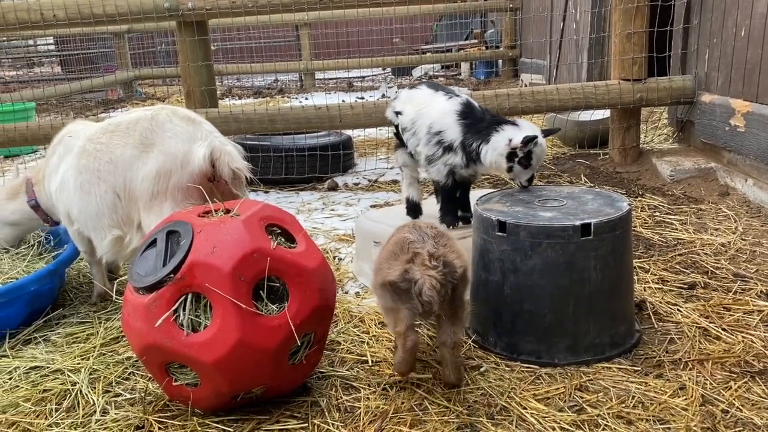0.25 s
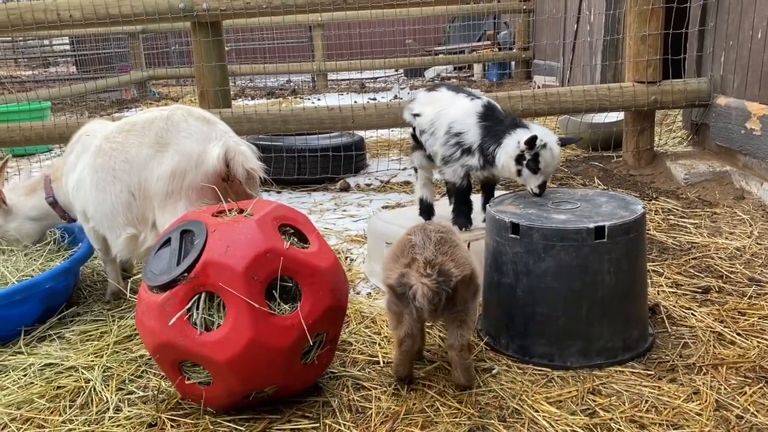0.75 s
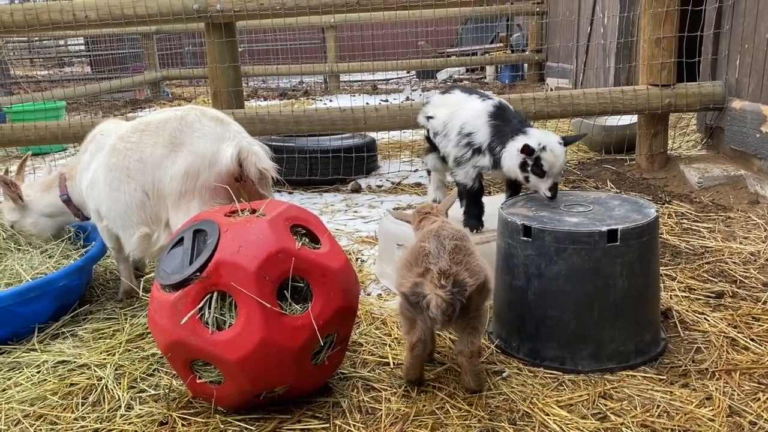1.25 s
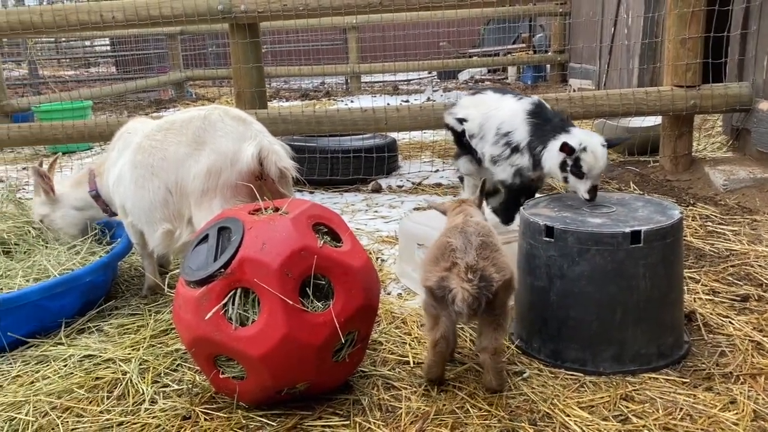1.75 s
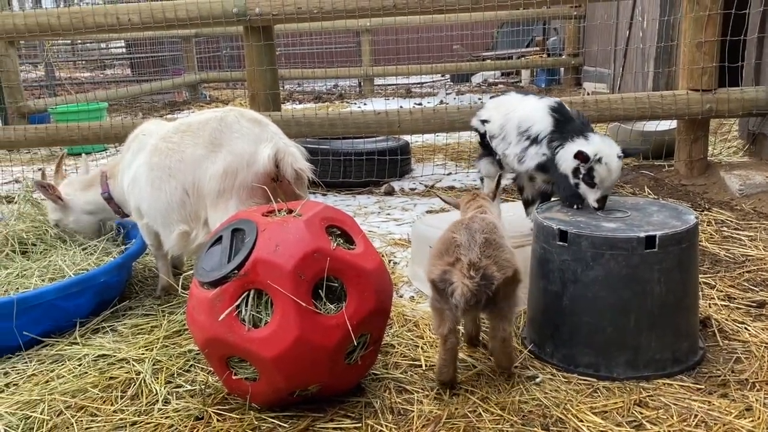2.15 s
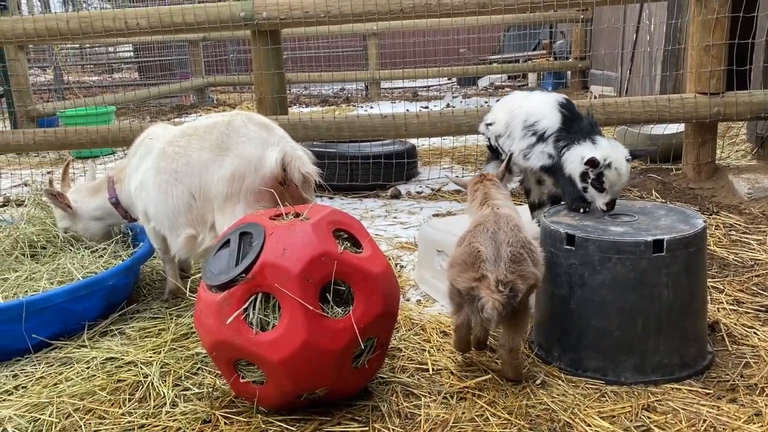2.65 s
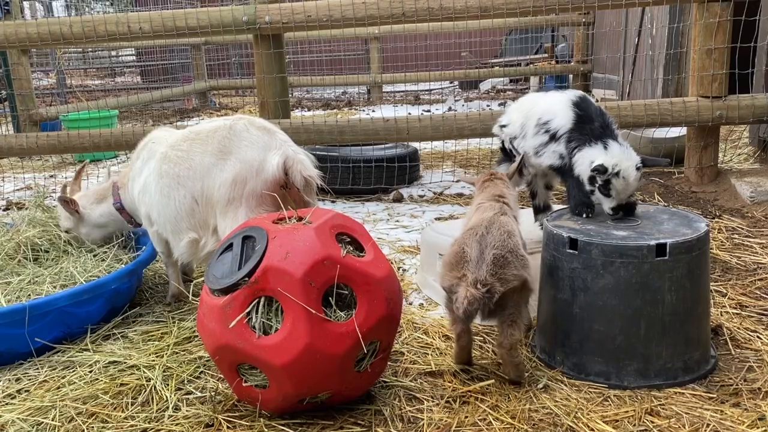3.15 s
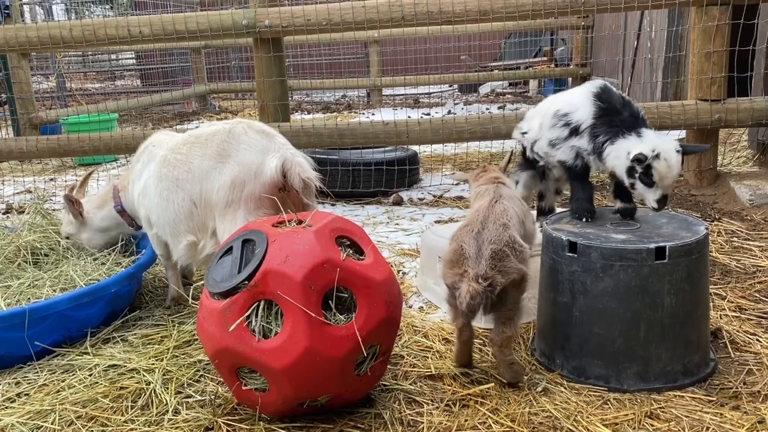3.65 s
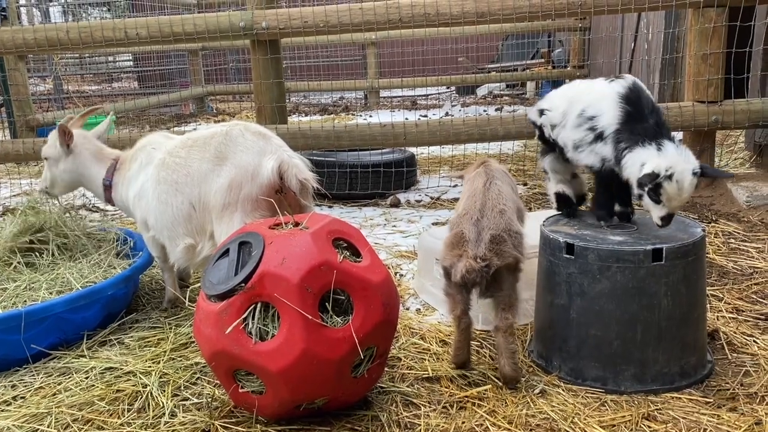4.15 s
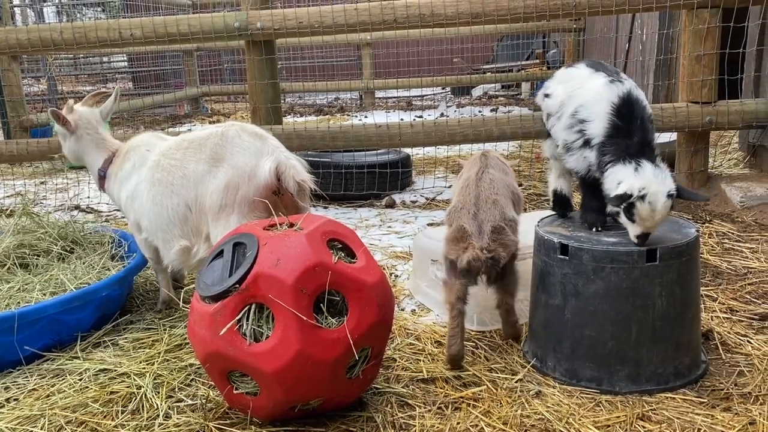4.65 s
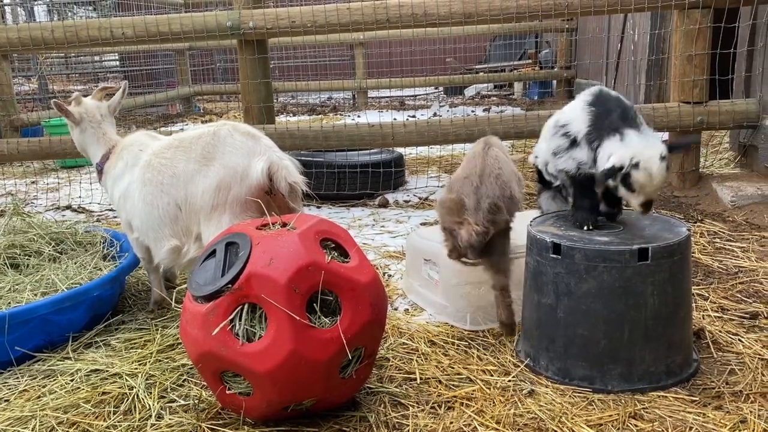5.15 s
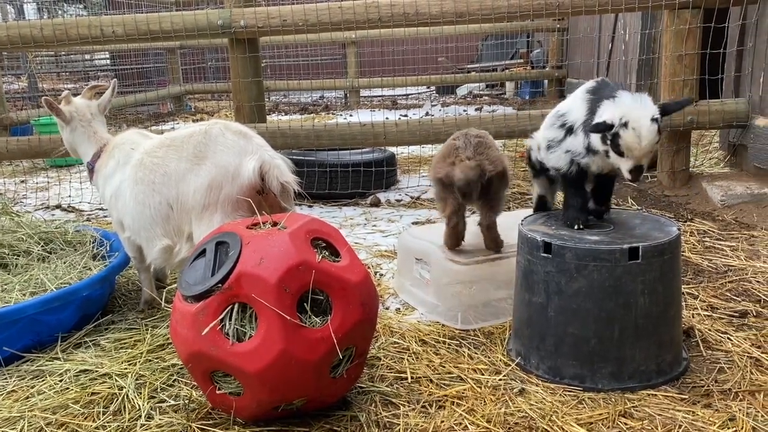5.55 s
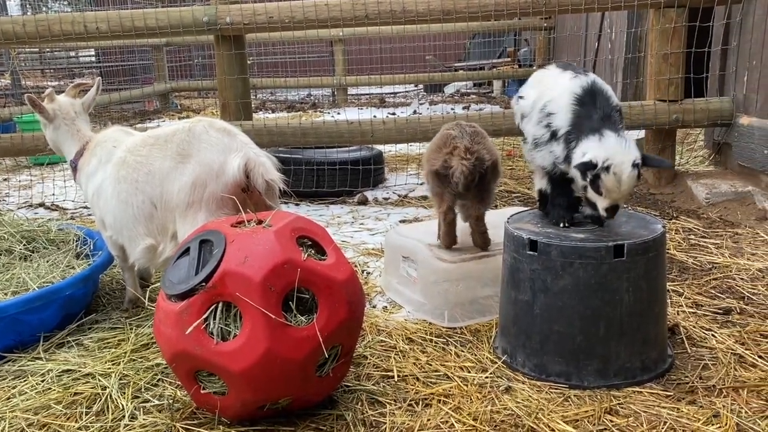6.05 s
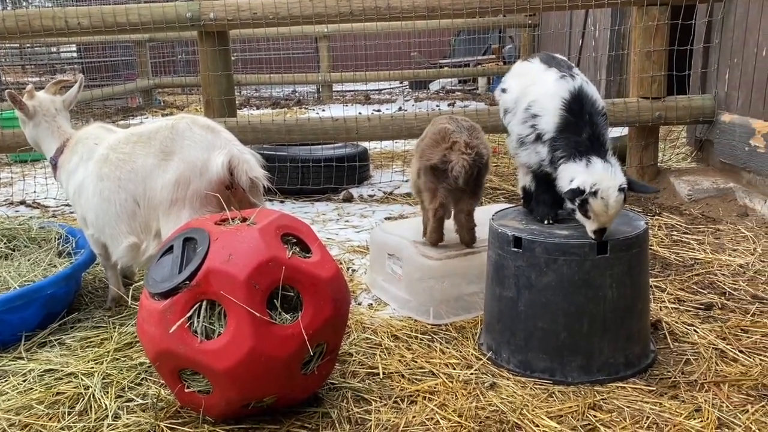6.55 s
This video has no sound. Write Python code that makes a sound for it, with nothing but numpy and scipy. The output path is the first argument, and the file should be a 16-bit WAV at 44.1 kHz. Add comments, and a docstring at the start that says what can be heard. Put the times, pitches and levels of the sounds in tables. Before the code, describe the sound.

Hollow plastic knocks and low thumps from a clambering goat kid grow busier amid faint straw rustle and far-off traffic hum.

```python
"""A straw-covered pen, where two goat kids clamber over an upturned plastic tub and a storage box.
Each hoof clacks on the shell (a cluster of short rings), then its weight makes the hollow top boom.
One hoof scrapes along the top. Straw rustles as coloured noise that swells, and stalks snap as bursts.
Some way off, engines drone as wavering tones over the rumble and tyre noise of a road."""
import sys
import numpy as np
from scipy import signal
from scipy.fft import rfft, irfft
from scipy.io import wavfile

SR = 44100
rng = np.random.default_rng(int(sys.argv[2]) if len(sys.argv) > 2 else 0)


def master_out(mix):
    """Clip the mix to full scale and print it as 16-bit PCM to the path in sys.argv[1]."""
    frames = np.transpose(np.atleast_2d(mix))
    ceiling = np.clip(frames, -1, 1)
    pcm = np.round(ceiling * 32767).astype(np.int16)
    wavfile.write(sys.argv[1], SR, pcm)


N = 299422   # length of the scene [samples]

# A t60 is the time a sound takes to die away by 60 dB.
# Hoof steps on plastic: (time [s], boom level [dB], strike level [dB], hardness [dB per octave],
# boom pitch [Hz], time to full weight [s], three modes of the struck spot, leading one first [Hz, Hz, Hz])
HOOF_STEPS = [(0.002, -48.5, -72, -9.5, 154, .007, 430, 830, 1090),
              (0.697, -45.5, -44.5, -0.5, 161, .013, 803, 443, 1336),
              (1.345, -44.5, -52, 0.7, 144.5, .028, 633, 272.4, 1970),
              (1.455, -44.5, -57.8, -6.4, 171.5, .008, 272, 677, 1230),
              (1.961, -38.5, -44, -1.8, 157, .035, 855, 244, 1168),
              (2.103, -36, -47, -2.5, 137, .018, 1350, 237, 845),
              (2.207, -58, -58, 5, 160, .006, 1113, 459, 833),
              (2.822, -74, -53.5, -3.5, 157, .005, 281, 636, 1134),
              (3.053, -29, -45, 1, 158, .0094, 1124, 267, 1520),
              (3.352, -36, -41.3, .2, 164.6, .011, 582, 374.5, 1116),
              (3.784, -28.5, -47.5, -1.2, 170.8, .015, 257, 732, 2130),
              (3.9, -44.5, -52, .3, 157.5, .03, 1153, 280, 588),
              (4.164, -33, -48.3, -1.3, 155.4, .016, 560, 462, 1143),
              (4.313, -42, -51.5, .5, 166.5, .012, 1497, 250, 667),
              (4.795, -50, -73, -4, 149, .009, 287, 760, 2160),
              (4.853, -41, -58, -1.4, 160.5, .018, 469, 740, 2090),
              (4.953, -56, -50.5, 3, 157, .0125, 1327, 280, 585),
              (5.092, -30, -45.5, -1.5, 146.6, .019, 322, 568, 2050),
              (5.222, -40, -50, 0, 148, .016, 690, 349, 1270),
              (5.394, -32, -60.5, -6.8, 167, .016, 256, 583, 1930),
              (5.666, -64, -63.5, 0, 164, .007, 467, 940, 1060),
              (5.728, -33.5, -37.5, -0.4, 168.6, .005, 930, 400, 1155),
              (5.893, -37, -46.5, -.6, 146.5, .009, 1142, 250, 623)]
# Ringing modes of the plastic shell: (pitch [Hz], level [dB], t60 [s])
SHELL_MODES = [(234.6, 4, 0.053), (267.2, -0.5, 0.15), (313, 0.5, 0.091), (381.6, -1, 0.057),
               (472.4, -8.5, 0.098), (528.5, -8, 0.13), (562, -14, 0.12), (641, 3, 0.095),
               (648, -3.5, 0.085), (748, -7, 0.061), (807, 8.5, 0.024), (824, -1.5, 0.07), (925, 0, 0.056),
               (859, 3.5, 0.038), (1135, 5.5, 0.063), (1190, 3, 0.031), (1405, -11.5, 0.18),
               (1514, 2.5, 0.041), (1643, -1, 0.043), (1804, 2, 0.023), (2030, -9, 0.03),
               (2220, -1.5, 0.038), (2330, -2, 0.025), (2540, 1, 0.016), (2820, 12, 0.013),
               (3350, -10, 0.017), (4120, 5, 0.018), (4870, -15, .018), (5700, -10, .015)]
# Pitch registers of the shell: (low edge [Hz], high edge [Hz], level added to the strike [dB],
# left minus right [dB], lag of the left side [s], contact time [s], t60 of the dense wall ringing [s],
# its level against the modes [dB], t60 of the pen's echo [s], its level before ECHO_GAIN [dB])
SHELL_REGISTERS = [(224, 494, -0.5, 1, 0.00026, 0.0023, 0.12, -7, 0.42, -17),
                   (480, 1050, -0.5, -6.5, .00015, 0.00052, 0.13, -7.5, 0.36, -29),
                   (1100, 2360, -7.4, -3.5, 0, 0.00025, 0.082, -8.5, 0.34, -19.5),
                   (2560, 4970, -25, 1.5, 0.0017, 0.00026, 0.042, -6.5, 0.11, -3.5)]
# A hoof dragging over the scuffed top: (time [s], level [dB])
SCRAPE_LEVEL = [(0, -110), (3.38, -100), (3.42, -55), (3.5, -58.5), (3.61, -61), (3.7, -59), (3.77, -100),
                (6.79, -110)]
# Colour of the scrape: (frequency [Hz], relative level [dB per Hz])
SCRAPE_COLOUR = [(260, 3), (450, 7), (800, 2), (1300, -13.5), (2200, -14), (3100, -18.5), (4300, -13),
                 (5600, -17.5), (7500, -38)]
# Stalks that crack under a hoof: (time [s], level [dB], thinness, moved from crunch to sizzle [dB],
# base decay time, stretched in snaps() [s])
STALK_SNAPS = [(0.51, -79, 15, .006), (1.399, -84, 0, .008), (1.53, -75.5, -1, 0.051), (2.177, -58, 4, .03),
               (2.205, -54.5, 0.5, 0.039), (2.781, -65.5, -6.5, 0.045), (3.046, -62, -0.5, 0.022),
               (3.412, -72, 2, .016), (4.577, -78.5, 14, 0.0073), (5.072, -73, -3, 0.044),
               (5.091, -55.5, -0.5, 0.025), (5.16, -83, -8, .015), (5.225, -75.5, 8, 0.053),
               (5.467, -69.5, 2.5, 0.076), (5.611, -79.5, -5, 0.064), (5.729, -59, 0, .008),
               (5.968, -87, 2, 0.043), (6.592, -91, 16, 0.028), (6.686, -78, 2, 0.085)]
# Colour of thick stalks rubbing: (frequency [Hz], relative level [dB per Hz])
CRUNCH_COLOUR = [(1200, 0), (1700, -9), (2300, -4.5), (3000, -11.5), (3800, -19.5)]
# Colour of middling stalks rubbing: (frequency [Hz], relative level [dB per Hz])
SWISH_COLOUR = [(2800, -10.5), (3400, -3.5), (4200, 0.5), (5300, -2), (6600, -1), (7700, -2.5), (8500, -17)]
# Colour of thin stalks rubbing: (frequency [Hz], relative level [dB per Hz])
HISS_COLOUR = [(7500, -25), (8500, -14), (9400, 0.5), (11000, 2.5), (12200, 1.5), (12900, -15),
               (13600, -10), (14400, -14.5), (15100, -2), (15800, -18)]
# Stirring of the hay, which dies away after the grown goat stops feeding: (time [s], level [dB])
STIRRING_LEVEL = [(0, -80.5), (1.5, -78.5), (4.3, -80.5), (4.9, -86.5), (5.7, -91.5), (6.05, -96),
                  (6.79, -95)]
# A leg or muzzle sweeps through the straw: (middle [s], width at half height [s], level [dB],
# coarseness, moved from hiss to crunch [dB])
STRAW_SHUFFLES = [(.01, 0.095, -69, 3.5), (0.143, 0.17, -73, -1), (0.344, 0.16, -72.5, -0.5),
                  (0.837, 0.14, -76, 1), (1, .1, -75, 1), (1.29, 0.14, -78, -1), (2.047, 0.27, -78.5, 6),
                  (2.205, 0.062, -62, 2.5), (2.276, 0.058, -69, 2.5), (2.692, 0.062, -75.5, -1.5),
                  (2.863, 0.14, -77, 1), (3.06, 0.19, -70.5, 2.5), (3.35, 0.1, -77.5, -2),
                  (3.527, 0.18, -71.5, 6), (4.05, 0.38, -66, 0), (4.46, 0.29, -86.5, 11.5),
                  (4.826, 0.086, -80, 0), (5.145, 0.23, -79.5, 10.5), (5.53, 0.18, -79.5, 4),
                  (6.277, 0.059, -84.5, 4), (6.44, 0.043, -84, 6), (6.78, 0.1, -78.5, 12)]
# An engine that pulls away and changes gear: (time [s], firing rate [Hz], level [dB])
PULLING_ENGINE = [(0, 84, -49), (.35, 84, -50), (.5, 82, -58), (.85, 84.5, -52), (2.7, 93, -60),
                  (3.4, 98, -56), (4.2, 104.5, -49), (4.45, 93, -54), (5.8, 96, -58), (6.35, 90, -50),
                  (6.79, 90, -51)]
# An engine that cruises closer: (time [s], firing rate [Hz], level [dB])
CRUISING_ENGINE = [(0, 85.5, -60), (1.2, 82, -54), (3, 79.7, -55), (5, 78, -52), (6.79, 77.6, -48)]
# A deeper drone: (time [s], pitch [Hz], level [dB])
DEEP_DRONE = [(0, 47, -61.5), (4.8, 47.7, -64), (5.2, 45.6, -48.5), (5.55, 46.7, -71), (5.9, 46.67, -58.5),
              (6.79, 46, -52)]
# Colour of far tyre noise: (frequency [Hz], relative level [dB per Hz])
TYRE_COLOUR = [(200, -5.5), (280, -8), (400, -1), (490, -5.5), (720, -0.5), (950, -7.5), (1300, -12.5),
               (1750, -25.5), (3100, -41.5)]
# Loudness of the tyre noise: (time [s], level [dB])
TYRE_LEVEL = [(0, -65), (1, -61.5), (2.2, -62.5), (3.2, -61.5), (4.5, -61.5), (5.7, -60.5), (6.3, -64),
              (6.79, -64)]
# Colour of the low traffic rumble: (frequency [Hz], relative level [dB per Hz])
RUMBLE_COLOUR = [(20, -13.5), (32, -13.5), (41, -10), (55, 2), (75, 5), (100, 0), (125, -6.5), (200, -7),
                 (260, -13), (330, -23)]
# Loudness of the rumble: (time [s], level [dB])
RUMBLE_LEVEL = [(0, -54), (2.6, -55.5), (4, -52), (5.3, -49), (6.79, -52.5)]
# Colour of the microphones' own hiss: (frequency [Hz], relative level [dB per Hz])
MIC_COLOUR = [(2500, 9), (6000, 7), (9000, 3), (12200, -16), (13000, -9)]
# How alike left and right are in noise: (frequency [Hz], likeness [1 = the same])
LEFT_RIGHT_LIKENESS = [(40, 0.54), (100, 0.71), (290, 0.66), (640, 0.12), (1400, -0.27), (3100, 0.42),
                       (7000, 0.19), (15000, -0.019)]

HIT_S = 0.5   # length of each step or snap [s]
STEP_WINDOW_S, SNAP_WINDOW_S = 0.05, 0.03   # first moments that set the level [s]
RING_CYCLES = 73   # t60 of a favoured mode in cycles, unless its longest t60 is shorter
KNOCK_HZ = 696   # a harder hoof tips the strike towards the treble about this pitch
LEAD_DB = 3.5   # lift of a register that holds the spot's leading mode
ECHO_GAIN = 1.87   # strength of the pen's echo, as a factor
SNAP_CRUNCH_DB, SNAP_SIZZLE_DB, SNAP_PAN_DB = -1, -7, 3   # low and high part re middle; left minus right
CRUNCH_DB, HISS_DB = -5, 3   # thick and thin stalks against the swish of the middling ones
SURGE_DB, SURGE_RATE_HZ = 2.1, 9.5   # chance swings of the rustle: typical size and speed
CUTOFF_HZ = 15900


def boom(t, hz, weight_s, t60, overtone, overtone_db):
    """The hollow top swells as the hoof takes the weight, then rings down with its next mode."""
    loading = np.sin(np.pi / 2 * np.minimum(t / weight_s, 1)) ** 2
    swell = loading * fade(np.maximum(t - weight_s, 0), t60)
    phase = 2 * np.pi * hz * (t - weight_s)
    return swell * (np.sin(phase) + from_db(overtone_db) * np.sin(overtone * phase))


def wall_modes(t, low_hz, high_hz, favoured_hz, longest_t60, favour_db, lead_db, scatter_db):
    """The shell rings in one register; the struck spot's own modes replace close neighbours."""
    favoured = []
    for f in favoured_hz:
        level_db = favour_db + lead_db * (f == favoured_hz[0])
        favoured.append((f, level_db, min(longest_t60, RING_CYCLES / f)))
    hz, db, t60 = np.transpose(SHELL_MODES + favoured)
    height = from_db(db + scatter_db * rng.standard_normal(len(hz))) * rng.choice([-1, 1], len(hz))
    # silence shell modes within about 2 % of a favoured pitch
    shell_count = len(SHELL_MODES)
    distance = np.abs(np.log(hz[:shell_count, None] / favoured_hz)).min(axis=1)
    height[:shell_count] *= distance > 0.02
    inside = (hz >= low_hz) & (hz <= high_hz)
    each_ring = np.sin(2 * np.pi * hz[inside, None] * t) * fade(t, t60[inside, None])
    return band(height[inside] @ each_ring, 0.57 * low_hz, 1.19 * high_hz)


def hollow_boom(t, boom_hz, weight_s):
    """The air and top under one hoof boom, with a faint low echo from fence and barn."""
    hollow = boom(t, boom_hz, weight_s, t60=0.12, overtone=1.35, overtone_db=-10.5)
    echo = band(rng.standard_normal(len(t)), 124, 218) * fade(t, 0.37)
    both = early_one(hollow, STEP_WINDOW_S) + from_db(-10.5) * early_one(echo, STEP_WINDOW_S)
    return place(both, -2.6, 0)


def shell_strike(t, wall_hz, register):
    """One register of a clack: clear modes and dense ringing, softened by the contact, then echo."""
    low_hz, high_hz, _, side_db, lag_s, contact_s, dense_t60, dense_db, echo_t60, echo_db = register
    modes = wall_modes(t, low_hz, high_hz, wall_hz,
                       longest_t60=0.087, favour_db=10.0, lead_db=3, scatter_db=2.5)
    dense = band(rng.standard_normal(len(t)) * fade(t, dense_t60), low_hz, high_hz, order=3)
    ringing = early_one(modes, STEP_WINDOW_S) + from_db(dense_db) * early_one(dense, STEP_WINDOW_S)
    direct = ringing * (1 - np.exp(-t / contact_s))
    # ground and neighbours reflect first, the barn wall later, differently on each side
    scatter = from_db(-6.0) * fade(t, dense_t60) + from_db(echo_db) * fade(t, echo_t60)
    echo = rms_one(band(rng.standard_normal((2, len(t))), low_hz, high_hz, order=3))
    echo = echo * scatter * (1 - fade(t, 0.041))
    return place(early_one(direct, STEP_WINDOW_S), side_db, lag_s) + ECHO_GAIN * echo


def hooves():
    """Each step is a click into the walls, brighter for a harder hoof, with a hollow boom under it."""
    out, t = np.zeros((2, N)), np.arange(int(HIT_S * SR)) / SR
    for s, boom_db, strike_db, hardness, boom_hz, weight_s, *wall_hz in HOOF_STEPS:
        add(out, from_db(boom_db) * hollow_boom(t, boom_hz, weight_s), s)
        for register in SHELL_REGISTERS:
            low_hz, high_hz, register_db = register[:3]
            octaves = np.log2(np.sqrt(low_hz * high_hz) / KNOCK_HZ)
            level_db = strike_db + register_db + hardness * octaves
            level_db += LEAD_DB * (low_hz <= wall_hz[0] <= high_hz)
            add(out, from_db(level_db) * shell_strike(t, wall_hz, register), s)
    return out


def scrape():
    """The edge of a hoof catches and slips on gritty plastic: grainy noise with random bursts."""
    slips = np.hypot(0.7, 0.7 * crackle(per_s=130, spread_db=3, t60=0.03))
    grit = noise(SCRAPE_COLOUR, grain_db=3.0)
    return from_db(in_time(SCRAPE_LEVEL)[0]) * slips * grit * panned(-0.65)


def snaps():
    """A stalk breaks with a sharp crack and a tail of splintering fibres; thin stalks sound brighter."""
    out, t = np.zeros((2, N)), np.arange(int(HIT_S * SR)) / SR
    for s, db, thin_db, t60 in STALK_SNAPS:
        sizes = from_db(3 * rng.exponential(1, len(t)).clip(0, 4))
        fibres = rng.standard_normal((3, len(t))) * sizes
        decay = fade(t, 0.0042) + from_db(-18.5) * fade(t, 2.4 * t60)
        direct = fibres[0] * decay * (1 - np.exp(-t / 0.00011))
        around = from_db(-15.0) * fibres[1:] * fade(t, 3 * t60)
        crack = place(direct, SNAP_PAN_DB, 0) + around
        parts = [(SNAP_CRUNCH_DB - thin_db, 1500, 3300),
                 (0, 3600, 7600),
                 (SNAP_SIZZLE_DB + thin_db, 8800, 12600)]
        for part_db, low_hz, high_hz in parts:
            part = early_one(band(crack, low_hz, high_hz, order=3), SNAP_WINDOW_S)
            add(out, from_db(db + part_db) * part, s)
    return out


def rubbing(thickness):
    """Level in dB of stalks of one thickness (-1 thin, 1 thick): shuffles swell over the stirring."""
    t, power = np.arange(N) / SR, from_db(in_time(STIRRING_LEVEL)[0]) ** 2
    for s, length_s, db, coarse_db in STRAW_SHUFFLES:
        swell = 0.5 ** np.minimum((2 * (t - s) / length_s) ** 2, 20)
        power = power + (from_db(db + thickness * coarse_db) * swell) ** 2
    return 10 * np.log10(power)


def straw():
    """Countless dry stalks rub: thick ones crunch, thin ones hiss, with small surges and crackles."""
    crunch_db = CRUNCH_DB + rubbing(0.93)
    swish_db = rubbing(0)
    hiss_db = HISS_DB + rubbing(-1.07)
    surge_db = SURGE_DB * drift(SURGE_RATE_HZ)
    breaks = crackle(per_s=100, spread_db=4, t60=0.028)
    # hypot joins a steady part with the crackling part
    crunch = noise(CRUNCH_COLOUR, grain_db=1.5) * np.hypot(0.9, 0.51 * breaks)
    swish = noise(SWISH_COLOUR, grain_db=0.8) * np.hypot(1.05, 0.51 * breaks)
    hiss = noise(HISS_COLOUR, grain_db=1.34) * np.hypot(1.1, 0.37 * breaks)
    mix = from_db(crunch_db) * crunch + from_db(swish_db) * swish + from_db(hiss_db) * hiss
    return from_db(surge_db) * mix


def engine(rows, waver_db, second_db):
    """From afar only the firing rate and a trace of its octave carry, wavering in the air."""
    hz, db = in_time(rows)
    phase = 2 * np.pi * np.cumsum(hz + 0.095 * drift(0.74)) / SR
    tone = np.sin(phase) + from_db(second_db) * np.sin(2 * phase)
    return from_db(db + waver_db * drift(2.5)) * np.sqrt(2) * tone


def traffic():
    """Engine notes, each from its own direction, over low rumble and tyre noise."""
    # a negative lag brings the left side in earlier
    pulling = place(engine(PULLING_ENGINE, waver_db=1.0, second_db=-38.0), -1.0, -0.0011)
    cruising = place(engine(CRUISING_ENGINE, waver_db=2.64, second_db=-24), -1.2, -0.00036)
    drone = engine(DEEP_DRONE, waver_db=-3.0, second_db=-23.5) * panned(-0.71)
    tyres = from_db(in_time(TYRE_LEVEL)[0] + 0.5 * drift(1.1)) * noise(TYRE_COLOUR)
    rumble = from_db(in_time(RUMBLE_LEVEL)[0] + 2.0 * drift(5.7)) * noise(RUMBLE_COLOUR)
    return pulling + cruising + drone + (tyres + rumble) * panned(-0.55)


def noise(spectrum, grain_db=0):
    """Stereo noise of a given colour, grainy if asked; left and right differ as the likeness tells."""
    hz = np.arange(N // 2 + 1) * SR / N
    # one random size for every 32 samples makes the grain
    sizes = from_db(grain_db * np.minimum(rng.exponential(1, N // 32 + 1), 5))
    grainy = rng.standard_normal((2, N)) * np.repeat(sizes, 32)[:N]
    # roll off steeply beyond both ends of the colour table
    outside = np.maximum(spectrum[0][0] / np.maximum(hz, 1), hz / spectrum[-1][0]).clip(1)
    mid, side = rfft(grainy) * from_db(at_hz(spectrum, hz)) / outside ** 6
    alike = np.clip(at_hz(LEFT_RIGHT_LIKENESS, hz), -0.9, 0.995)
    mid, side = irfft(mid, N), irfft(side * np.sqrt((1 - alike) / (1 + alike)), N)
    return np.array([mid + side, mid - side]) / mid.std()


def crackle(per_s, spread_db, t60):
    """Loudness curve of tiny random bursts that each die away, scaled to rms 1."""
    happens = rng.random(N) < per_s / SR
    sizes = from_db(spread_db * rng.exponential(1, N).clip(0, 2.5)) * happens
    return rms_one(signal.lfilter([1], [1, -fade(1 / SR, t60)], sizes + 1e-9))


def drift(rate_hz):
    """Slow random wandering of rms 1: noise smoothed by two equal low-passes, one value per 40 samples."""
    r = np.exp(-80 * np.pi * rate_hz / SR)
    # drop the first 2000 values, while the filter settles
    slow = signal.lfilter([1], [1, -2 * r, r * r], rng.standard_normal(N // 40 + 2002))[2000:]
    return np.interp(np.arange(N) / 40, np.arange(len(slow)), rms_one(slow))


def fade(t, t60):
    """Exponential decay that falls 60 dB in t60 seconds."""
    return np.exp(-np.log(1000) * t / t60)


def band(x, low_hz, high_hz, order=2):
    """Keep the sound between two frequencies."""
    edges = [low_hz, min(high_hz, SR / 2 - 500)]
    return signal.sosfilt(signal.butter(order, edges, "band", fs=SR, output="sos"), x)


def from_db(db):
    """Decibels to gain."""
    return 10 ** (np.asarray(db) / 20)


def rms_one(x):
    """Scale to rms 1."""
    return x / np.sqrt(np.mean(x ** 2) + 1e-20)


def early_one(x, span_s):
    """Scale a blow so that its first moments have rms 1."""
    return x / np.sqrt(np.mean(x[..., :int(span_s * SR)] ** 2) + 1e-20)


def in_time(rows):
    """Columns of a curve at every sample."""
    s, *columns = np.transpose(rows)
    return [np.interp(np.arange(N) / SR, s, c) for c in columns]


def at_hz(points, hz):
    """Read a table on a log-frequency axis."""
    f, value = np.transpose(points)
    return np.interp(np.log(np.maximum(hz, 1)), np.log(f), value)


def panned(pan_db):
    """Left and right gains whose mean is 1."""
    gains = from_db([[pan_db / 2], [-pan_db / 2]])
    return gains / gains.mean()


def place(x, pan_db, lag_s):
    """Mono to stereo: a level difference and a late left side."""
    n = np.arange(len(x))
    left = np.interp(n - round(lag_s * SR), n, x, left=0)
    return np.array([left, x]) * panned(pan_db)


def add(out, x, s):
    """Mix a stereo sound in at a time in seconds."""
    i = max(int(s * SR), 0)
    out[:, i:i + x.shape[1]] += x[:, :N - i]


def scene():
    """The pen and its surroundings, from the hooves to the far road."""
    return hooves() + scrape() + snaps() + straw() + traffic()


def record(dry):
    """The microphones add a faint hiss; the top is cut steeply."""
    with_hiss = dry + from_db(-93.5) * noise(MIC_COLOUR)
    return signal.sosfilt(signal.ellip(10, 0.1, 80, CUTOFF_HZ, fs=SR, output="sos"), with_hiss)


dry = scene()
out = record(dry)
master_out(out)
```